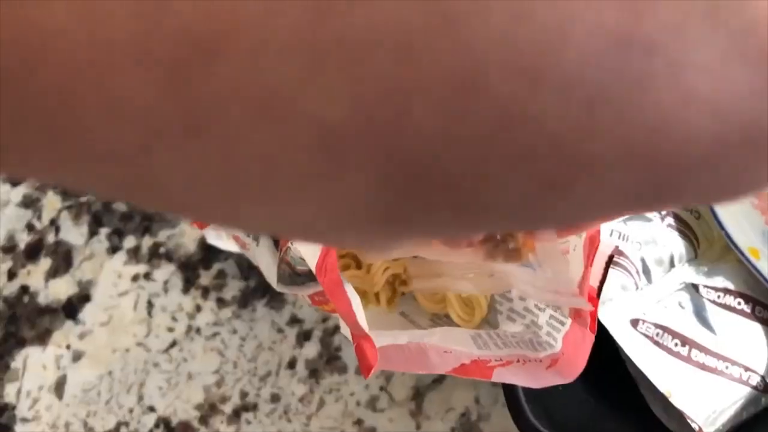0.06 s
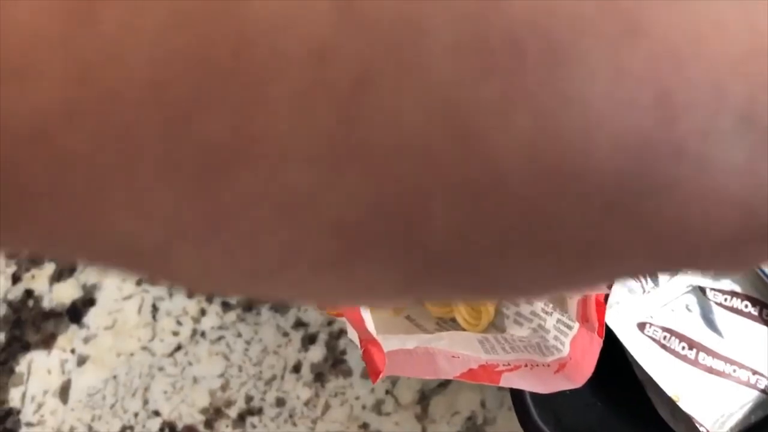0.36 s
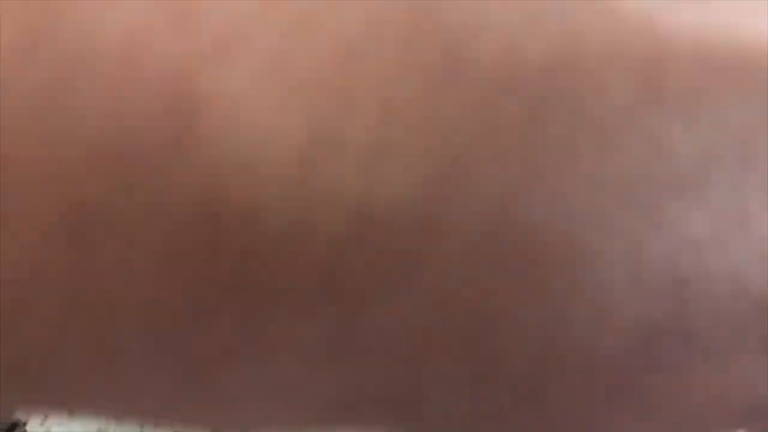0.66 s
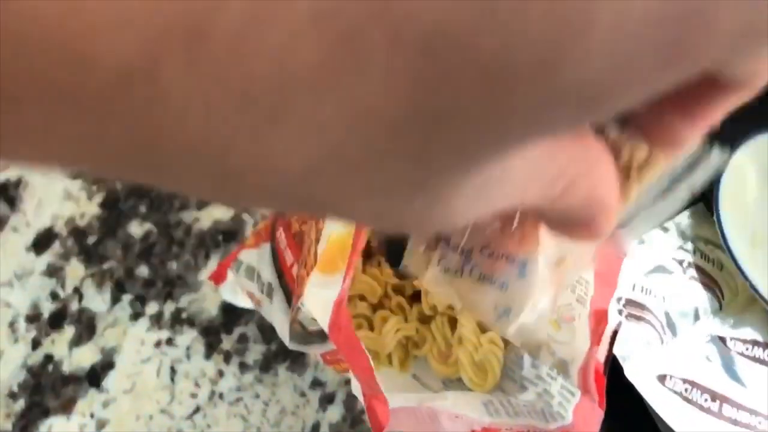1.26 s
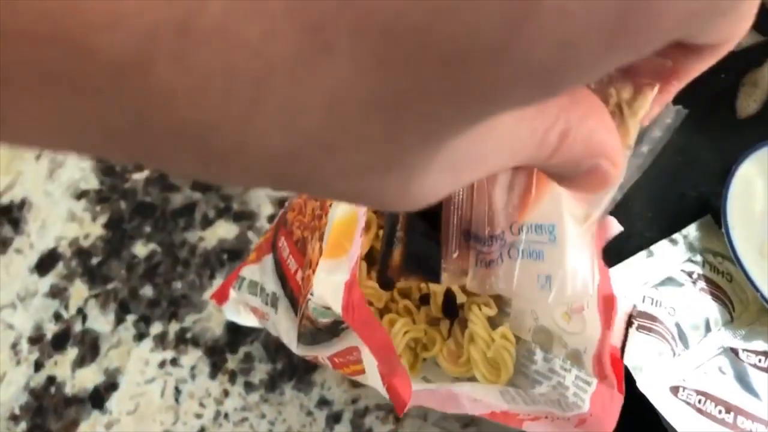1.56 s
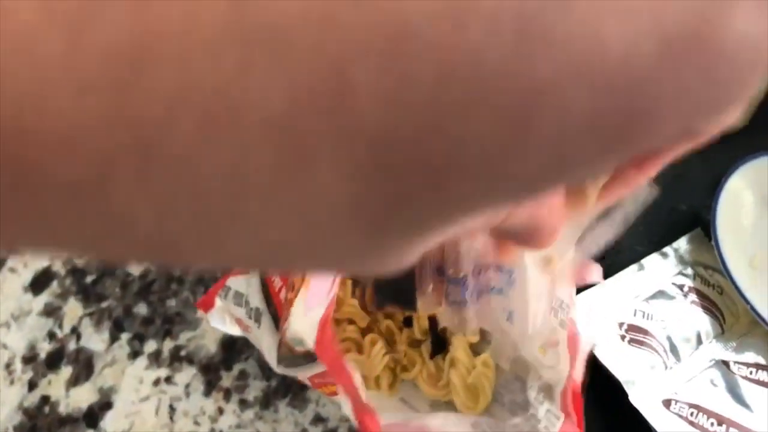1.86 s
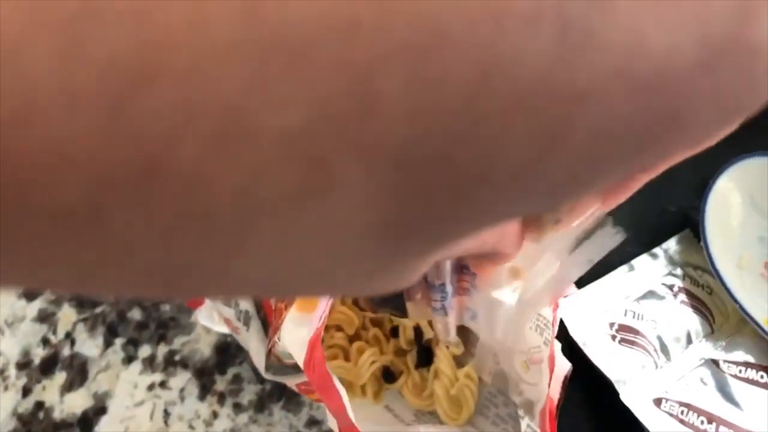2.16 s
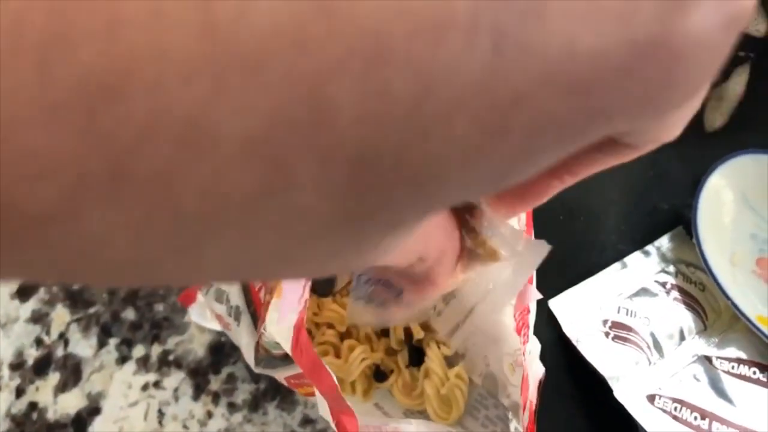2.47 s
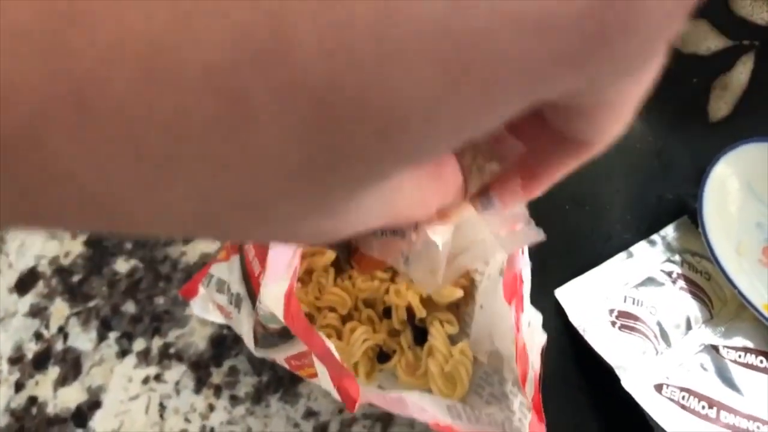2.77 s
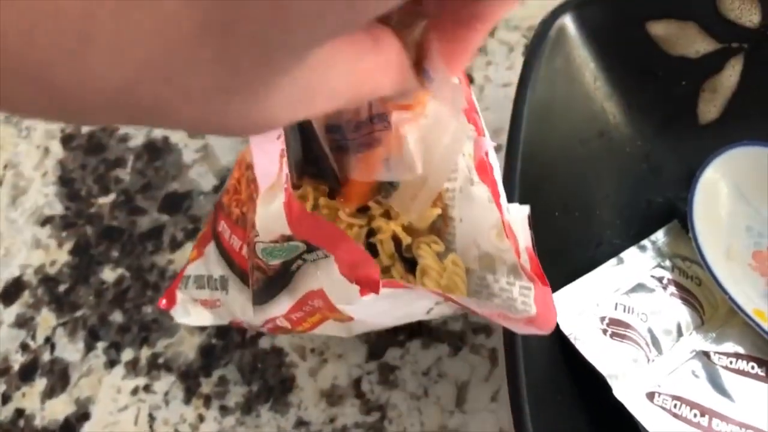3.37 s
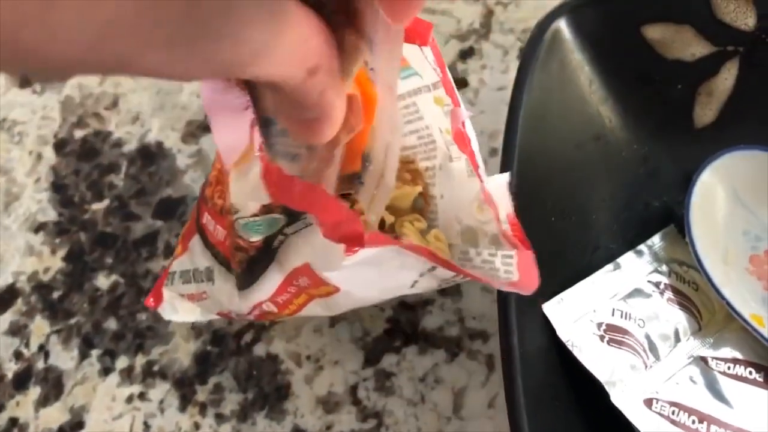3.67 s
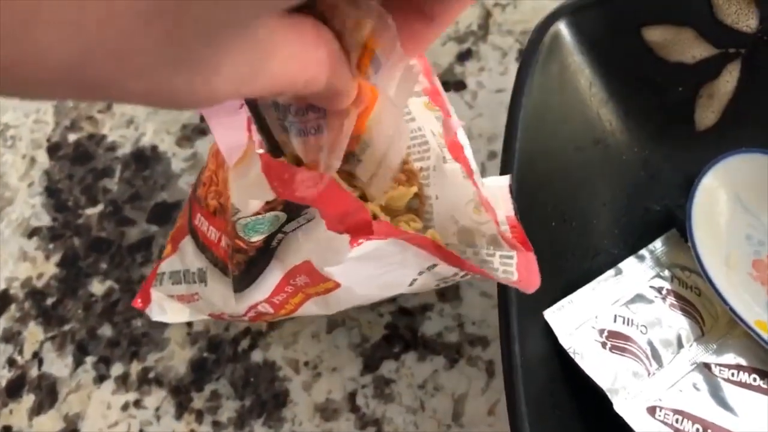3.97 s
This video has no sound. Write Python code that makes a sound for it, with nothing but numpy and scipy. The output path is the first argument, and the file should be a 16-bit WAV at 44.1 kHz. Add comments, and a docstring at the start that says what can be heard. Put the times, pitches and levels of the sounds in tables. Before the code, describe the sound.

Thin plastic crinkles up close as a hand rummages in a packet of dry noodles.

```python
"""Thin plastic crinkles up close: a hand draws a sachet out of an open packet of dry noodles.
Creases in the film buckle with millisecond snaps. Each move of the fingers slides film over film and
scrapes the noodle block, which now and then knocks softly. Behind it all, an appliance hums
in the small, quiet kitchen."""
import sys
import numpy as np
from scipy import signal
from scipy.fft import rfft, irfft
from scipy.io import wavfile
from scipy.ndimage import uniform_filter1d

SR = 44100
rng = np.random.default_rng(int(sys.argv[2]) if len(sys.argv) > 2 else 0)


def persist_wave(psi):
    """Save psi, clipped to +-1, as 16-bit WAV."""
    counts = np.round(np.clip(psi, -1, 1) * 32767).astype(np.int16)
    wavfile.write(sys.argv[1], SR, np.atleast_2d(counts).T)


N = 176400


def undb(db):
    """Decibels to gain."""
    return 10 ** (np.asarray(db) / 20)


def unit(x):
    """Scale to rms 1."""
    return x / np.sqrt(np.mean(x ** 2) + 1e-20)


def band(x, low_hz, high_hz, order=2):
    """Causal band-pass."""
    return signal.sosfilt(signal.butter(order, [low_hz, high_hz], "band", fs=SR, output="sos"), x)


def colour(x, curve, size=4096):
    """Minimum-phase EQ through (freq_hz, gain_db) points: nothing rings ahead of an attack."""
    hz, db = np.array(curve, float).T
    bins_hz = np.maximum(np.fft.rfftfreq(size, 1 / SR), 1)
    gain = undb(np.interp(np.log(bins_hz), np.log(hz), db))
    cepstrum = irfft(np.log(gain))
    cepstrum[1:size // 2] *= 2
    cepstrum[size // 2 + 1:] = 0
    return signal.fftconvolve(x, irfft(np.exp(rfft(cepstrum))))[:N]


def drift(rate_hz):
    """Smooth random modulation at rms 1."""
    hold = int(SR / rate_hz)
    steps = np.repeat(rng.standard_normal(N // hold + 1), hold)
    return unit(uniform_filter1d(uniform_filter1d(steps, hold), hold)[:N])


def place(starts_s, sounds):
    """Lay short sounds on the timeline."""
    track = np.zeros(N + sounds.shape[1])
    for start_s, sound in zip(starts_s, sounds):
        i = int(np.clip(start_s * SR, 0, N))
        track[i:i + len(sound)] += sound
    return track[:N]


def wavering_tone(pitch_hz, unsteady, waver_hz=7):
    """A sine that wavers in level and phase; unsteady runs from 0 (pure) to 1 (all waver)."""
    wander = (drift(waver_hz) + 1j * drift(waver_hz)) / np.sqrt(2)
    carrier = np.exp(2j * np.pi * (pitch_hz * np.arange(N) / SR + rng.random()))
    return unit(np.real((1 - unsteady + unsteady * wander) * carrier))


def appliance():
    """Mains hum, wavering motor tones and a swelling drone over a low rush of air."""
    # tone colour of the rushing air: freq_hz, gain_db
    air_eq = [(25, -17.5), (42, -29.5), (60, -7.5), (95, -3.5), (135, 1.5), (185, -0.5), (260, -5),
              (340, -9), (470, -20.5), (650, -15.5), (1000, -21), (2000, -32.5), (5000, -37), (12000, -73)]
    # swell of the motor drone: time_s, level_db
    drone_swell = [(0, -61), (1.0, -65), (1.5, -57.5), (1.8, -59), (2.0, -57.5), (2.3, -62), (3.0, -57),
                   (3.25, -58), (3.42, -48.5), (3.8, -51.5), (4, -54)]
    # mains and motor tones: pitch_hz, level_db, unsteady_share
    hum_tones = [(71.7, -65.5, 0.47), (120.2, -50.5, 0.1), (218.6, -63, 0.61), (280, -68.5, 0.45),
                 (356.7, -71.5, 0.44), (581, -77.5, 0.56), (657, -74.5, 0.47), (1303, -72.5, 0.1)]
    air = undb(-54) * unit(colour(rng.standard_normal(N), air_eq))
    drone_db = np.interp(np.arange(N) / SR, *np.array(drone_swell).T)
    drone = undb(drone_db) * wavering_tone(pitch_hz=175, unsteady=.5)
    hum = sum(undb(db) * wavering_tone(hz, unsteady) for hz, db, unsteady in hum_tones)
    return air + drone + hum


def kitchen(x, t60_s=.45, predelay_s=.004, wet_db=-21.5):
    """Walls and cupboards add a short, faint wash to the direct sound."""
    t = np.arange(SR // 2) / SR
    tail = band(rng.standard_normal(len(t)), low_hz=200, high_hz=6950, order=1)
    tail *= np.exp(-np.log(1000) * t / t60_s) * (t > predelay_s)
    tail /= np.sqrt(np.sum(tail ** 2))
    return x + undb(wet_db) * signal.fftconvolve(x, tail)[:N]


def block_knocks(attack_s=.0005, t60_s=.017, size=3000):
    """The packet and its noodle block bump and ring in a few well-damped modes."""
    # soft bumps: start_s, peak_db, pitch_hz
    knocks = [(.019, -42, 700), (.152, -36, 820), (0.6867, -43, 1180), (1.4129, -37, 1245),
              (1.636, -40, 700), (1.726, -43.5, 1000), (1.891, -38, 380), (1.8952, -35.5, 900),
              (2.128, -47, 950), (2.713, -42, 520), (2.7745, -34.5, 420), (3.594, -36, 800)]
    # modes of a bump: pitch_ratio, gain_db
    modes = [(.68, -3), (1, 5), (1.45, -5)]
    start_s, peak_db, pitch_hz = np.array(knocks).T
    t = np.arange(size) / SR
    phases = rng.random((len(knocks), len(modes)))
    ring = sum(undb(gain_db) * np.sin(2 * np.pi * (ratio * pitch_hz[:, None] * t + phases[:, [k]]))
               for k, (ratio, gain_db) in enumerate(modes))
    ring *= (1 - np.exp(-t / attack_s)) * np.exp(-np.log(1000) * t / t60_s)
    gain = undb(peak_db) / abs(ring).max(axis=1)
    return place(start_s, ring * gain[:, None])


def friction(slips_per_s, spread_db, hiss, decay_s):
    """Many tiny slips of uneven size, each with a short flutter, over the hiss of smooth sliding."""
    sizes = undb(spread_db * np.minimum(rng.exponential(size=N), 5))
    slips = (rng.random(N) < slips_per_s / SR) * sizes ** 2
    power = signal.lfilter([1], [1, -np.exp(-1 / (decay_s * SR))], slips + 1e-18)
    grains = unit(np.sqrt(power) * rng.standard_normal(N))
    return grains + hiss * rng.standard_normal(N)


def noodle_scrape():
    """Dry noodles catch and slip in a coarse midrange rasp."""
    # tone colour of the scraped block: freq_hz, gain_db
    noodle_eq = [(200, -7.5), (450, -8.5), (650, 0), (850, 3.5), (1100, 1), (1600, -0.5), (2100, -4),
                 (4000, -21.5), (12000, -37)]
    rasp = friction(slips_per_s=500, spread_db=6, hiss=.37, decay_s=.0012)
    return unit(colour(rasp, noodle_eq))


def sliding_film(flicker_db=2.2, flicker_hz=45, pivot_hz=4840):
    """Film rubs on film; as it folds, different facets radiate, so bands flicker and brightness shifts."""
    # tone colour of the film: freq_hz, gain_db
    film_eq = [(500, 7), (1200, -26.5), (1600, -6.5), (2000, -1), (3200, 1.5), (4200, 0), (5400, 6),
               (7800, 1.5), (11000, 1), (16000, -22)]
    # brightness of the film, treble against mids: time_s, tilt_db
    brightness = [(0, -3.5), (.42, -4), (.54, -2.5), (.7, -4.5), (1.0, -2), (1.35, -3), (1.9, -3),
                  (2.1, -2), (2.27, 2.5), (2.65, 0), (3.1, 0), (3.48, 0.5), (3.66, -2.5), (4, -4.5)]
    # borders of the bands that flicker independently: edge_hz
    edges_hz = [400, 1300, 2200, 3300, 4700, 6200, 8000, 10000, 16000]
    rub = friction(slips_per_s=1900, spread_db=4, hiss=.26, decay_s=.00076)
    spectrum, bins_hz = rfft(colour(rub, film_eq)), np.fft.rfftfreq(N, 1 / SR)
    tilt_db = np.interp(np.arange(N) / SR, *np.array(brightness).T)
    film = 0
    for low_hz, high_hz in zip(edges_hz, edges_hz[1:]):
        layer = irfft(spectrum * (bins_hz >= low_hz) * (bins_hz < high_hz), N)
        lean = np.clip(2 * np.log2(np.sqrt(low_hz * high_hz) / pivot_hz), -1, .5)
        film += layer * undb(lean * tilt_db + flicker_db * drift(flicker_hz))
    return unit(film)


def hand_rustle(attack_s=.016, release_s=.026, film_floor_db=-66.5, noodle_floor_db=-76):
    """Each move of the hand swells and fades, sliding the film and scraping the noodles."""
    # moves of the hand: start_s, length_s, film_db, noodle_db
    moves = [(0.0, .14, -58, -58), (0.202, 0.18, -57.5, -68.5), (0.375, 0.082, -58, -68.5),
             (0.479, 0.11, -56, -58), (0.603, .13, -54.5, -55.5), (0.752, 0.049, -57.5, -72),
             (0.855, 0.086, -54.5, -54), (0.948, 0.066, -52, -58.5), (1.079, 0.089, -50.5, -60),
             (1.15, 0.09, -54, -66), (1.241, 0.077, -50, -58.5), (1.337, 0.11, -52, -57),
             (1.452, 0.077, -53.5, -55.5), (1.513, .11, -52.5, -66), (1.61, 0.14, -62.5, -57),
             (1.76, 0.075, -51, -59.5), (1.835, 0.12, -58, -61), (1.928, 0.079, -52.5, -56),
             (2.014, 0.1, -53, -60), (2.165, 0.17, -59, -77), (2.357, 0.13, -49, -60.5),
             (2.539, 0.018, -46, -59), (2.584, .11, -48.5, -59), (2.726, 0.11, -54.5, -64.5),
             (2.871, 0.1, -57.5, -66.5), (2.945, .08, -57, -70), (3.04, .11, -64, -75),
             (3.326, 0.1, -62, -74), (3.405, 0.16, -52.5, -68), (3.562, 0.049, -49.5, -53),
             (3.63, 0.13, -55, -60), (3.82, 0.11, -56, -58), (3.96, 0.12, -60.5, -62)]
    t = np.arange(N) / SR
    film_power, noodle_power = undb(film_floor_db) ** 2, undb(noodle_floor_db) ** 2
    for start_s, length_s, film_db, noodle_db in moves:
        swell = np.clip((t - start_s) / attack_s + .5, 0, 1)
        let_go_s = start_s + length_s - release_s / 2
        effort = swell * np.exp(-np.maximum(t - let_go_s, 0) / release_s)
        film_power += (effort * undb(film_db)) ** 2
        noodle_power += (effort * undb(noodle_db)) ** 2
    return sliding_film() * np.sqrt(film_power) + noodle_scrape() * np.sqrt(noodle_power)


def crease_snaps(size=900, onset=130):
    """A faint swell of noise leads into each snap; then the film flutters, the sprung facet and air ring."""
    # buckling creases: time_s, body_db, crack_db, tick_db
    snaps = np.array([(0.0314, -61.5, -44, -48.5), (0.0657, -47, -47, -46), (0.1119, -56, -43, -49),
                      (0.151, -32, -33, -37.5), (0.1554, -49, -39, -48), (0.3186, -56, -44.5, -38),
                      (0.455, -67, -72, -53), (0.491, -47, -35, -43), (0.5683, -55, -49, -42),
                      (0.6359, -46, -40.5, -43), (0.6431, -51, -55, -40.5), (0.6867, -42, -61, -45),
                      (0.697, -43, -39, -35), (0.7023, -43.5, -45.5, -47), (0.8606, -53, -41.5, -42),
                      (0.8659, -53, -55, -48), (0.9108, -58, -51, -35.5), (0.9272, -63, -45, -45),
                      (0.9455, -36.5, -27.5, -26), (0.993, -46.5, -36.5, -28.5), (1.059, -51, -50, -43),
                      (1.0866, -48, -65, -33), (1.122, -40, -32, -38.5), (1.1407, -53, -54, -43),
                      (1.1515, -41.5, -34.5, -45), (1.2589, -46, -48, -62), (1.2715, -48, -31.5, -25.5),
                      (1.2764, -37.5, -36, -27.5), (1.4058, -53, -61, -48.5), (1.4742, -51, -48, -51),
                      (1.5528, -47, -38.5, -30.5), (1.5764, -59, -59, -42), (1.5893, -51.5, -48, -44),
                      (1.6391, -56, -46.5, -33), (1.6608, -51, -44, -39.5), (1.6702, -61, -44, -45),
                      (1.6881, -63, -47.5, -43), (1.7727, -59, -43, -59), (1.7986, -48, -43, -39),
                      (1.8902, -54, -44, -53), (1.9446, -49, -40.5, -44.5), (1.9917, -67, -36, -49),
                      (2.017, -42, -52, -65), (2.0491, -41.5, -35.5, -28), (2.1148, -51, -49, -38.5),
                      (2.1965, -50.5, -35.5, -27.5), (2.342, -68, -93, -44.5), (2.3946, -46, -51, -52),
                      (2.4675, -75, -58, -42), (2.498, -44.5, -54, -58), (2.6032, -79, -46, -40.5),
                      (2.6075, -41.5, -44, -42), (2.6293, -53, -42, -37), (2.6363, -66, -58, -37.5),
                      (2.7124, -28.5, -31.5, -29), (2.7295, -58, -59, -34), (2.75, -65, -60, -38),
                      (2.7552, -60, -46, -33), (2.774, -40.5, -46, -47), (2.8012, -72, -42.5, -42.5),
                      (2.836, -55, -48, -42), (2.881, -75, -79, -44.5), (3.1073, -65, -73, -49.5),
                      (3.3168, -68, -57, -50), (3.3981, -77, -56.5, -49), (3.4306, -80, -74, -46),
                      (3.4385, -70, -44, -37), (3.4523, -51, -65, -40.5), (3.492, -62, -61, -43),
                      (3.5761, -69, -43, -45.5), (3.5926, -40, -33.5, -36), (3.6385, -50, -39.5, -58),
                      (3.8382, -43.5, -38.5, -52), (3.8573, -37, -30, -32), (3.8616, -45, -56, -38),
                      (3.8648, -65, -35.5, -47), (3.9454, -52, -51, -49), (3.9753, -66, -74, -51)])
    # body, crack and tick layers of a snap: low_hz, high_hz, flutter_decay_s
    layers = [(820, 2130, 0.0014), (2670, 5350, 0.0011), (5100, 10330, 0.00089)]
    lead_in_gain, jolt_gain, facet_gain = .21, 3, 1.03  # relative to the flutter
    lead_in_s, facet_decay_cycles = .001, 1.9
    pocket_gain, level_window_s = 1.6, .004
    t = (np.arange(size) - onset) / SR  # the crease snaps at t = 0
    noise = rng.standard_normal((len(snaps), len(layers), size))
    facet_draws = rng.random((len(snaps), len(layers), 2))
    sounds = 0
    for k, (low_hz, high_hz, decay_s) in enumerate(layers):
        lead_in = lead_in_gain * np.exp(-abs(t) / lead_in_s)
        push = noise[:, k] * np.where(t < 0, lead_in, np.exp(-abs(t) / decay_s))
        push[:, onset] += jolt_gain * (-1) ** k
        if k == 0:  # the body rings the pocket of air in the packet
            layer = band(push, low_hz, high_hz)
            layer += pocket_gain * band(layer, low_hz=1490, high_hz=1750, order=1)
        else:  # the facet rings for a few cycles at a random pitch within the band
            pitch_hz = low_hz * (high_hz / low_hz) ** facet_draws[:, k, :1]
            cycles, phase = pitch_hz * abs(t), facet_draws[:, k, 1:]
            ring = (t >= 0) * np.exp(-cycles / facet_decay_cycles) * np.sin(2 * np.pi * (cycles + phase))
            layer = band(push + facet_gain * ring, low_hz, high_hz)
        rms = np.sqrt(np.sum(layer ** 2, axis=1) / (level_window_s * SR))
        sounds += layer * (undb(snaps[:, k + 1]) / rms)[:, None]
    return place(snaps[:, 0] + t[0], sounds)


def scene():
    """The packet close by with a touch of room, the appliance low behind it, in mono."""
    packet = crease_snaps() + block_knocks() + hand_rustle()
    return (kitchen(packet) + appliance())[None]


def record(dry):
    """The highest treble is cut away: a dip above 12 kHz, then a low-pass."""
    # treble roll-off: freq_hz, gain_db
    treble_eq = [(20, 1.5), (10800, -0.5), (11700, -0.5), (12500, -17), (16000, -3)]
    cutoff_hz = 16300
    low_pass = signal.ellip(8, .2, 70, cutoff_hz, fs=SR, output="sos")
    return signal.sosfilt(low_pass, colour(dry[0], treble_eq))[None]


dry = scene()
out = record(dry)
persist_wave(out)
```